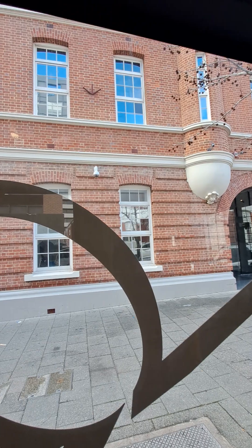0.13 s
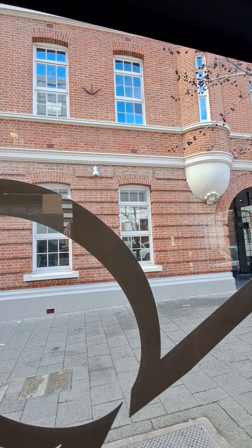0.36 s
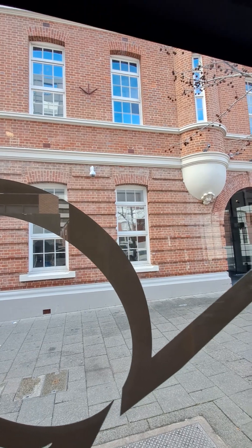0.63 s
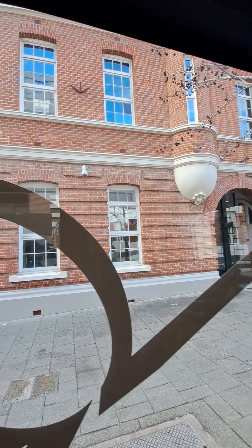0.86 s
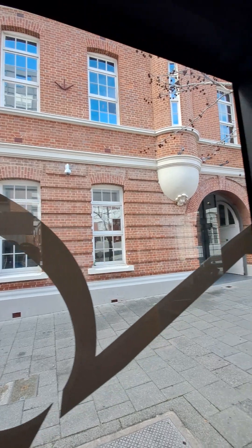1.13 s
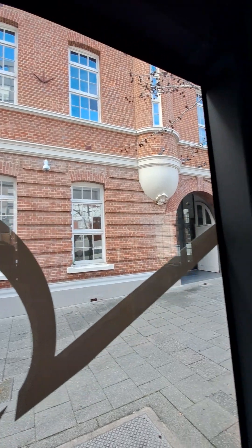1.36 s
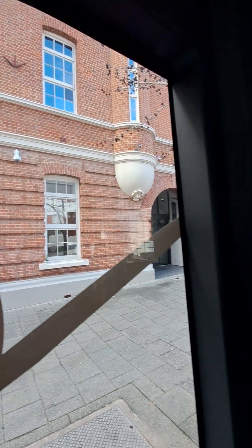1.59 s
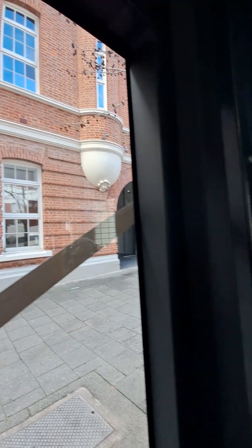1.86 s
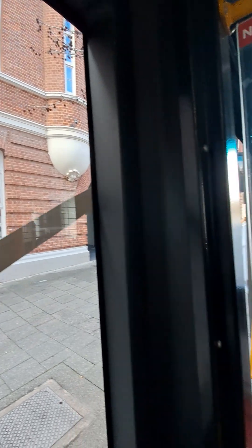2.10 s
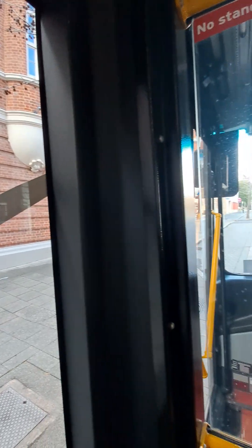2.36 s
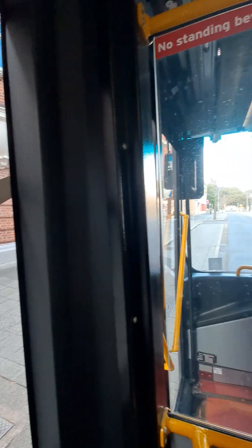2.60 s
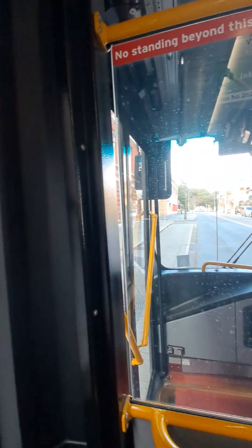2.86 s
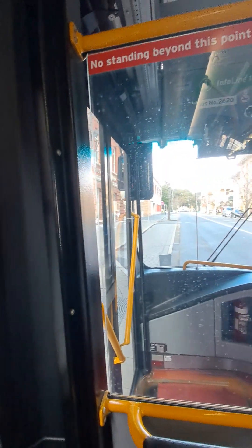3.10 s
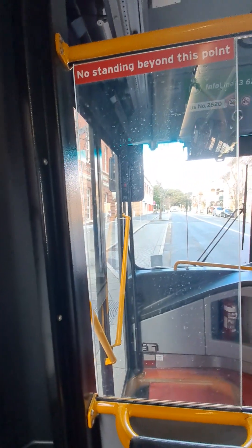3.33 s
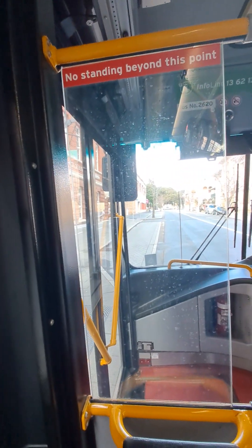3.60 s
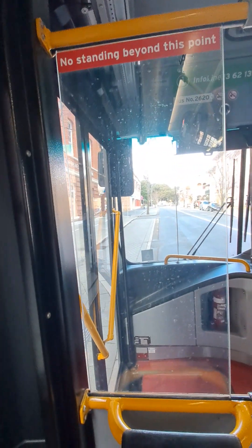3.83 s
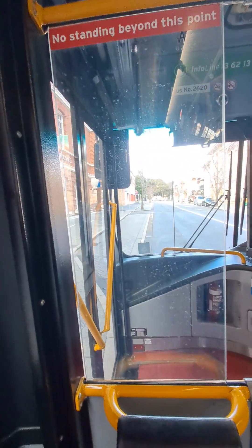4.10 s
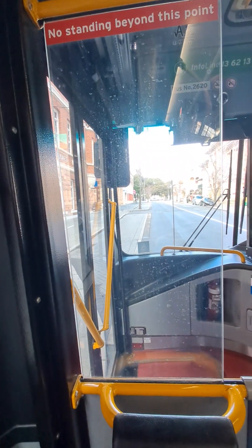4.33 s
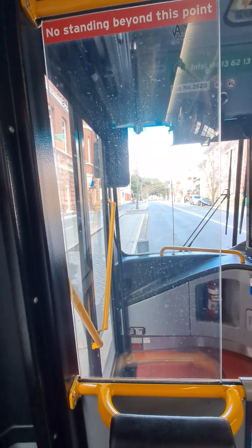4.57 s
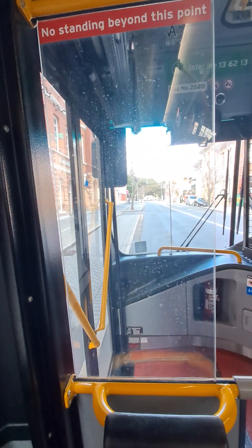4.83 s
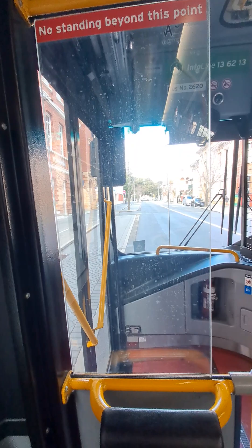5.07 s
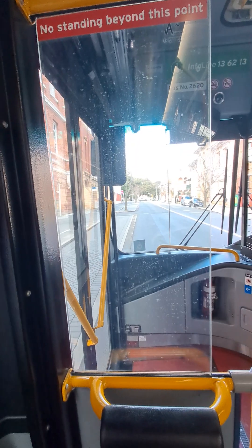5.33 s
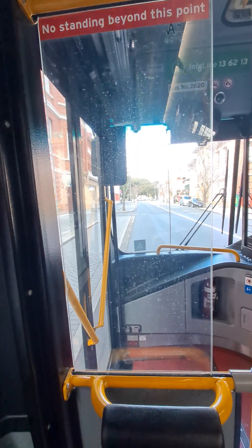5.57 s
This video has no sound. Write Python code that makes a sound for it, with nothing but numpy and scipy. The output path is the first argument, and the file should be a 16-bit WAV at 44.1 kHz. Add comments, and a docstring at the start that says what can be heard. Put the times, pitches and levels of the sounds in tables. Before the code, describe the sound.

Inside a bus, a diesel idles low, sags briefly as it engages, then revs up into a steadier hum while an indicator relay ticks faintly.

```python
"""A bus diesel idles, sags under load, then revs up as the bus pulls away from a stop, heard inside.
The engine is a sum of sines locked to its firing rate; shaped noise gives body rumble, hum, rush, hiss and fizz.
A ringing relay ticks and tocks, noise bursts make trim clicks and soft scuffs, and damped sines thud in the floor.
A hand-held phone with two microphone ports listens."""
import sys
import numpy as np
from scipy import signal
from scipy.fft import rfft, irfft, next_fast_len
from scipy.io import wavfile
from scipy.ndimage import uniform_filter1d, map_coordinates

SR = 44100
rng = np.random.default_rng(int(sys.argv[2]) if len(sys.argv) > 2 else 0)


def amplitude_ratio(level_db):
    """Convert a level in decibels to the matching linear amplitude (field) ratio."""
    exponent = np.asarray(level_db, float) / 20
    return 10 ** exponent


def transcribe(signal):
    """Save signal, clipped to [-1, 1], as a 16-bit WAV file at the path in sys.argv[1]."""
    frames = np.atleast_2d(signal).T
    limited = np.clip(frames, -1, 1)
    pcm = np.round(limited * 32767).astype(np.int16)
    wavfile.write(sys.argv[1], SR, pcm)


N = 251218

# firing rate of the diesel: t/s, f/Hz
FIRING = [(0, 35), (.4, 34.9), (1.2, 34.5), (1.35, 33.8), (1.5, 30.35), (1.65, 30.5), (1.8, 32.2),
          (2.25, 33.5), (2.4, 34.3), (2.7, 35), (3, 43.9), (3.15, 46.8), (3.3, 47.45), (3.5, 47.1),
          (3.9, 48.5), (4.2, 50.1), (4.5, 48.55), (5.1, 49.6), (5.3, 49.1), (5.7, 49.3)]
# rustle of people stirring nearby, before each layer's own scaling: t/s, level/dB
STIRRING = [(0, -57), (.33, -58), (.6, -61), (.9, -56.5), (1.08, -60), (1.35, -59), (1.52, -54.5),
            (1.95, -57), (2.17, -54), (2.4, -56), (2.7, -60), (3, -55), (3.5, -57.5), (3.95, -61.5),
            (4.36, -57.5), (4.75, -62.5), (5.28, -60.5), (5.7, -61)]


def unit(x):
    """Normalisation: a signal divided by its root mean square has rms 1."""
    return x / np.sqrt(np.mean(x ** 2) + 1e-20)


def along(points, hz):
    """Interpolation over the logarithm of frequency, from rows of frequency and value."""
    f, v = np.transpose(points)
    return np.interp(np.log(hz + 1), np.log(f + 1), v)


def curves(rows):
    """Linear interpolation in time: one value per sample for each column after the time."""
    s, *columns = np.transpose(rows)
    t = np.arange(N) / SR
    return [np.interp(t, s, column) for column in columns]


def wobble(rate):
    """Slow random modulation: a smooth curve through rate random knots a second."""
    knots = rng.standard_normal(int(N * rate / SR) + 4)
    return map_coordinates(knots, [np.arange(N) * rate / SR])


def filtered(x, response):
    """Linear filtering: the spectrum is multiplied by a complex response of frequency."""
    m = next_fast_len(x.shape[-1] + 8192)
    spectrum = rfft(x, m) * response(np.fft.rfftfreq(m, 1 / SR))
    return irfft(spectrum, m)[..., :x.shape[-1]]


def staged(idle_db, gear_db, rev_db):
    """Crossfade of gains: idling passes to in gear, then to revving."""
    t = np.arange(N) / SR
    # middle and length of each change, s
    in_gear_s, engage_s, rev_s, wind_up_s = 1.42, .1, 2.81, .16
    geared = np.clip((t - in_gear_s) / engage_s + .5, 0, 1)
    revving = np.clip((t - rev_s) / wind_up_s + .5, 0, 1)
    return (1 - geared) * amplitude_ratio(idle_db) + (geared - revving) * amplitude_ratio(gear_db) + revving * amplitude_ratio(rev_db)


def narrow_noise(bands):
    """Resonance excited by noise: one fuzzy tone for each centre f/Hz, half-width f/Hz and level/dB."""
    out = 0
    for hz, width, db in bands:
        white = rng.standard_normal(N)
        out = out + amplitude_ratio(db) * unit(filtered(white, lambda f: 1 / (1 + ((f - hz) / width) ** 2)))
    return out


def stereo_noise(gain, patchy_db):
    """Spatial coherence: patchy noise of rms 1, as alike at the two ports as the cabin field is."""
    # coherence of the cabin field: f/Hz, left-right likeness
    likeness = [(30, 1), (100, 0.75), (170, 1), (340, 0.56), (650, 0.48), (950, 0.38), (1400, 0.23),
                (2400, .1), (5000, .02)]
    z = signal.stft(rng.standard_normal((2, N)), nperseg=512)[2]
    # random gain, smoothed over frequency and then over time
    field = uniform_filter1d(uniform_filter1d(rng.standard_normal(z.shape[1:]), 6, 0), 10, 1)
    pair = signal.istft(z * amplitude_ratio(patchy_db * unit(field)), nperseg=512)[1][:, :N]

    def turn(hz):
        return np.arccos(np.clip(along(likeness, hz), -1, 1)) / 2

    mid, side = filtered(pair, lambda hz: gain(hz) * [np.cos(turn(hz)), np.sin(turn(hz))])
    return unit(np.array([mid + side, mid - side]))


def add_with_echo(out, s, sound, wet_db):
    """Reverberation: a short sound plus its convolution with a fresh decaying noise tail at each port."""
    # reverberation time of the cabin: f/Hz, t60/s
    decay = [(300, 0.14), (2500, 0.31), (12000, 0.065)]
    hz, t, z = signal.stft(rng.standard_normal((2, SR // 4)), SR, nperseg=256)
    tail = signal.istft(z * amplitude_ratio(-60 * t / along(decay, hz)[:, None]), SR, nperseg=256)[1]
    tail = tail / np.linalg.norm(tail[0])
    wet = signal.fftconvolve(np.atleast_2d(sound), tail, axes=1) * amplitude_ratio(wet_db)
    wet[:, :sound.shape[-1]] += sound
    place = out[:, max(round(s * SR), 0):][:, :wet.shape[1]]
    place += wet[:, :place.shape[1]]


def burst(shape, db, low_db, high_db, low_hz):
    """Spectral shaping: noise under an envelope, with a hump around low_hz and a tilt in the treble."""
    hump = [(low_hz / 2, low_db - 14), (low_hz / 1.2, low_db + 5), (low_hz * 1.2, low_db + 5)]
    treble = [(3200, -1), (5200, -1.0), (6500, -6.5), (8000, high_db + 1.5), (15000, high_db - 1.5)]
    colour = hump + treble
    white = rng.standard_normal(shape.shape)
    # the level is referred to the noise between 2.8 and 7 kHz
    middle = filtered(white, lambda hz: (hz > 2800) & (hz < 7000))
    return amplitude_ratio(db) * shape * filtered(white, lambda hz: amplitude_ratio(along(colour, hz))) / np.std(middle)


def body_rumble():
    """Forced vibration: shaken panels give broad low noise, and cabin air resonances boom in it."""
    # spectrum of the broad rumble: f/Hz, relative level per hertz/dB
    spectrum = [(15, -34), (25, -11), (40, -5), (60, 1), (100, -6.5), (130, 1), (165, -9.5), (200, -13),
                (320, -19.5), (450, -43), (600, -72)]
    # cabin air resonances: f/Hz, half-width f/Hz, level/dB over the stage gain
    air_modes = [(35.6, 8.6, 2.5), (101.5, 2.3, 3)]
    broad = stereo_noise(lambda hz: amplitude_ratio(along(spectrum, hz)), patchy_db=1.0)
    return staged(-35.5, -34.5, -37) * (narrow_noise(air_modes) + amplitude_ratio(8.0) * broad)


def panel_hum():
    """Panel resonance: narrow bands of noise hum together at a wavering level."""
    # panel modes: f/Hz, half-width f/Hz, level/dB over the hum level
    modes = [(320, 8.9, -7), (364, 116, -5), (416, 4, -8.5)]
    # hum level before its random waver: t/s, level/dB
    hum_level = [(0, -49), (.3, -41.5), (1.4, -38.5), (2.5, -48.5), (3.3, -49), (3.8, -49.5), (4.05, -46),
                 (4.4, -45), (4.7, -52.5), (5.7, -47)]
    return amplitude_ratio(curves(hum_level)[0] + 1.7 * wobble(4.15)) * narrow_noise(modes)


def engine_bay_rush():
    """Amplitude modulation: broad noise from the engine bay throbs at the firing rate."""
    # spectrum of the rush: f/Hz, relative level/dB
    spectrum = [(180, -19.5), (300, -4), (562, -5), (648, -2.5), (770, -6), (957, -9), (1050, -10.5),
                (2400, -20), (3290, -30), (4000, -33), (5200, -54), (8800, -120)]
    throb = 1 + 0.028 * np.sin(2 * np.pi * np.cumsum(curves(FIRING)[0]) / SR)
    gain = staged(-44, -44.5, -45) * amplitude_ratio(3.0 + 0.27 * wobble(7))
    return gain * throb * stereo_noise(lambda hz: amplitude_ratio(along(spectrum, hz)), patchy_db=1.53)


def air_hiss():
    """Turbulent noise: a broad treble hiss rises and falls with the rustle level."""
    # spectrum of the hiss: f/Hz, relative level/dB
    spectrum = [(1760, -5), (3000, -1.5), (3300, -5), (4330, -2), (6120, -6.5), (6630, -10.5), (7500, -13),
                (9750, -37), (16500, -120)]
    gain = amplitude_ratio(curves(STIRRING)[0] + 3.5 + 0.82 * wobble(11))
    return gain * stereo_noise(lambda hz: amplitude_ratio(along(spectrum, hz)), patchy_db=0.6)


def cloth_fizz():
    """Friction noise: cloth fizzes in the high treble and swings wider in level than the rustle."""
    # spectrum of the fizz: f/Hz, relative level/dB
    spectrum = [(4120, -35), (7000, -3), (8520, -2.5), (9510, -3), (11900, -0.5), (15500, -9.5)]
    quiet_db, fizz_db, growth = -59.5, -64, 1.3  # fizz_db belongs to a rustle of quiet_db
    level_db = fizz_db + growth * (curves(STIRRING)[0] - quiet_db) + .9 * wobble(22)
    return amplitude_ratio(level_db) * stereo_noise(lambda hz: amplitude_ratio(along(spectrum, hz)), patchy_db=2.5)


def floor_thuds():
    """Damped free vibration: each thud or knock is a decaying tone with a partial 1.6 times higher."""
    # thuds and knocks: t/s, relative level/dB, f/Hz
    blows = [(.314, -29.5, 874), (.436, -28, 858), (0.846, -20, 204.5), (1.917, -22.5, 165),
             (2.868, -23, 254), (4.829, -16.5, 179)]
    out, t = np.zeros((2, N)), np.arange(SR // 5) / SR
    for s, db, hz in blows:
        ring = np.sin(2 * np.pi * hz * t) + .5 * np.sin(2 * np.pi * 1.6 * hz * t)
        envelope = amplitude_ratio(db + 4.0 - 60 * t / 0.071) * (1 - np.exp(-t / 0.0057))
        add_with_echo(out, s, envelope * ring, wet_db=-20.0)
    return out


def soft_scuffs():
    """Sliding friction: noise in rough grains swells and fades, its waveform unrelated at the ports."""
    # scuffs: t/s, relative level/dB, relative low level/dB, relative treble level/dB, low hump f/Hz
    strokes = [(.19, -37.5, -16, -12, 1000), (.298, -44, 15, -32, 1590), (.312, -45.5, 20, -30.5, 920),
               (.409, -45.5, 10, -22.5, 1800), (.431, -43, 17, -36, 930), (.781, -42.5, -6.5, -11, 1300),
               (.819, -44.5, 16, -26, 1540), (.839, -34, 10, -27.5, 1640), (.914, -42.5, 3, -17.5, 1880),
               (1.29, -45, 0, -30, 2280), (1.344, -32, 3, -32, 2200), (1.5, -50, -6, 1.5, 1000),
               (1.566, -40.5, 2.5, -28.5, 1500), (1.594, -34.5, 2.5, -10.5, 1480),
               (1.691, -35, 4.5, -24, 1450), (1.918, -38, 4, -11, 1400), (2.28, -49, 7, 0, 1000),
               (2.352, -43, 3, -19.5, 2290), (2.947, -33.5, -1.5, -8, 2000), (3.159, -39, -12, -8, 1000),
               (4.113, -36.5, -2.5, -4.5, 2200), (4.881, -39, -13, -10, 1000)]
    stroke_s = 0.048
    out, t = np.zeros((2, N)), np.arange(SR // 5) / SR
    swell = (np.e * 2.46 * t / stroke_s * np.exp(-2.5 * t / stroke_s)) ** 1.03
    for s, db, low_db, high_db, low_hz in strokes:
        # a new random gain every 90 samples, about 2 ms
        grain = amplitude_ratio(3.7 * np.repeat(rng.standard_normal(len(t) // 90 + 1), 90)[:len(t)])
        rub = burst(swell * grain * [[1], [1]], db - 14.0, low_db, high_db, low_hz)
        add_with_echo(out, s - .008, rub, wet_db=-0.5)  # the swell begins 8 ms before the listed time
    return out


def trim_clicks():
    """Impulse and scattering: a click cracks at once, then scatters off seats and glass."""
    # clicks: t/s, relative level/dB, relative low level/dB, relative treble level/dB
    cracks = [(0.1782, -35.5, -15, -10), (0.548, -45, -9, -12), (1.499, -45.5, 1, 0),
              (1.6014, -46, -18, -0.5), (1.8613, -38.5, 3, -17.5), (2.024, -41, 1, -15),
              (2.09, -38.5, 1, -9), (2.1554, -46.5, -6, -2), (2.683, -49, -12.5, -4.5),
              (2.7447, -37, -9, -9.5), (2.8864, -51, 0, 0), (2.9355, -27, -4.5, -8.5), (3.0616, -49, 6, 1),
              (3.157, -42, -16, -8.5), (3.214, -46.5, 0, -3.5), (3.2904, -42.5, 4, -16),
              (4.0276, -36, -8, -10), (4.3154, -35, -7.5, -10), (4.3873, -48, -3, -7),
              (4.4674, -43.5, 1.5, -13.5), (4.62, -50.5, -5, -4.5), (4.8532, -40, -7.5, -6.5),
              (4.8804, -47, -10.5, -8), (5.1207, -42.5, -10, -8.5), (5.3053, -37, -14, -11.5),
              (5.6093, -40, -18, -12.5)]
    out, t = np.zeros((2, N)), np.arange(SR // 5) / SR
    sharp = amplitude_ratio(-60 * t / 0.0063)
    spread = amplitude_ratio(-60 * t / 0.14) * (1 - np.exp(-t / 0.00047)) * [[1], [1]]  # t60 0.14 s
    for s, db, low_db, high_db in cracks:
        crack = burst(sharp, db + 3.0, low_db, high_db, low_hz=1800)
        scattered = burst(spread, db - 6.5, low_db, high_db, low_hz=1800)
        add_with_echo(out, s, crack + scattered, wet_db=-7.5)
    return out


def turn_indicator():
    """Modal ringing: a far-off relay closes with a tick and opens with a duller tock, mostly heard as echo."""
    # modes of the relay housing: f/Hz, tick relative level/dB, tock relative level/dB
    modes = [(1330, -19.5, -4), (1800, -24, -1.5), (1922, -13, -2), (2290, -10, -13), (2381, 1, -2),
             (2480, -9, -14), (2603, -12, -19), (2980, -16, -18), (3765, -15, -13), (4290, -21, -16)]
    first_tick_s, blink_s, lit_s = .1305, .5851, .3305
    tick_gain_db, tock_gain_db = -30, -38
    fade_db_per_s = 0.72  # the phone turns away from the relay's echo
    out, t = np.zeros((2, N)), np.arange(SR // 20) / SR
    hz, tick_db, tock_db = np.transpose(modes)[..., None]
    damped = amplitude_ratio(-60 * t / .028) * (1 - np.exp(-t / .0015))
    strokes = (first_tick_s, tick_gain_db, tick_db), (first_tick_s + lit_s, tock_gain_db, tock_db)
    for first_s, db, strengths_db in strokes:
        for s in np.arange(first_s, N / SR, blink_s):
            strengths = amplitude_ratio(strengths_db + 0.87 * rng.standard_normal(hz.shape))
            ring = damped * strengths * np.sin(2 * np.pi * hz * t)
            add_with_echo(out, s, amplitude_ratio(db - fade_db_per_s * s) * ring.sum(0), wet_db=6.5)
    return out


def diesel_engine():
    """Order synthesis: nearly clean tones locked to the firing rate; uneven firing shakes their size."""
    # engine orders and shaft-driven accessories: multiple of the firing rate
    multiples = [1, 1.373, 1.5, 2, 2.285, 2.5, 3, 3.05, 3.41]
    # one row per multiple: idling, in gear and revving relative level/dB,
    # then change per sag below idle/(dB/Hz), change per acceleration/(dB s/Hz)
    order_levels = [(-42, -39.5, -33, -2.3, 0.1854), (-58.5, -56, -20, -1.5, -0.2768),
                    (-36.5, -39.5, -35.5, 1.6, 0.06), (-29.5, -30, -20.5, 0.9, 0),
                    (-23.5, -26.5, -62, -1.5, -0.28), (-61, -47, -38.5, 5, 0), (-65, -20.5, -63, -1, 0),
                    (-28, -44, -41, -4.5, 0), (-32.5, -46, -55, 5, 0)]
    # slow beating of the tones near 100 Hz: t/s, level/dB
    beating = [(0, 0), (.3, 5), (.6, -3), (.95, -7), (1.2, 3), (1.36, -9), (1.58, 4), (1.78, -14),
               (1.92, 0), (2.2, 5.5), (2.46, -2), (2.65, 2), (2.85, -14), (3.1, -7), (3.35, 0), (3.8, 1),
               (4.07, -5), (4.17, 6.5), (4.4, -6), (4.78, 4), (4.93, -7), (5.06, 2), (5.25, -12),
               (5.5, 5.5), (5.7, 0)]
    idle_hz, beat_hz, beat_width_hz = 34.8, 100, 19
    (firing_hz,), (swell_db,) = curves(FIRING), curves(beating)
    phase = 2 * np.pi * np.cumsum(firing_hz) / SR
    sag_hz = np.maximum(idle_hz - firing_hz, 0)
    # rise of the firing rate in Hz/s, averaged over 1/8 s
    speeding = uniform_filter1d(np.maximum(np.gradient(firing_hz) * SR, 0), size=SR // 8)
    out = 0
    for k, (*stages_db, lug_db, surge_db) in zip(multiples, order_levels):
        near_100 = 1 / (1 + ((k * firing_hz - beat_hz) / beat_width_hz) ** 4)
        shaken_db = lug_db * sag_hz + near_100 * swell_db + .9 * wobble(6) + surge_db * speeding
        tone = np.sin(k * phase + 0.11 * wobble(5) + 2 * np.pi * rng.random())
        out = out + staged(*stages_db) * amplitude_ratio(shaken_db) * tone
    return np.sqrt(2) * amplitude_ratio(0.89) * out


def scene():
    """Superposition: the pressures of all the sources in the cabin add."""
    background = body_rumble() + panel_hum() + engine_bay_rush() + air_hiss() + cloth_fizz()
    contacts = floor_thuds() + soft_scuffs() + trim_clicks()
    return background + contacts + turn_indicator() + diesel_engine()


def band_limit(x):
    """A steep low-pass at the top of the band."""
    return signal.sosfilt(signal.butter(12, 15680, fs=SR, output="sos"), x)


def record(dry):
    """Two-port reception: ports a few centimetres apart differ in colour and bass roll-off, hence in phase."""
    # level difference of the ports: f/Hz, left over right level/dB
    port_colour = [(30, 2.8), (65, 1.8), (100, 1), (170, -.9), (330, 1.6), (470, -.4), (670, 2.3),
                   (1300, 0), (2300, -.8), (3000, 2.5), (4200, 1.2), (5700, 4), (7200, 0), (11000, -7),
                   (15000, -5)]
    # phase difference of the ports: f/Hz, left lead/rad
    port_lead = [(30, -.65), (47, -.53), (65, -.35), (100, -.21), (170, 0), (470, .32), (670, .65),
                 (1300, 1.9), (2000, 2.5)]
    side, edge = np.array([[.5], [-.5]]), 2048  # half of each difference to each port
    running = np.pad(dry, ((0, 0), (edge, edge)), "reflect")  # the sound was already running
    ports = filtered(running, lambda hz: amplitude_ratio(side * along(port_colour, hz))
                     * np.exp(1j * side * along(port_lead, hz)))
    return band_limit(ports[:, edge:-edge])


dry = scene()
out = record(dry)
transcribe(out)
```